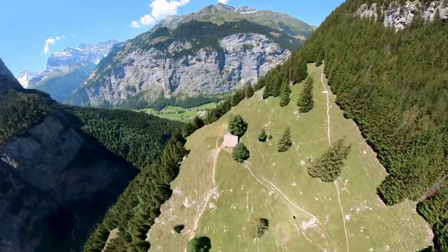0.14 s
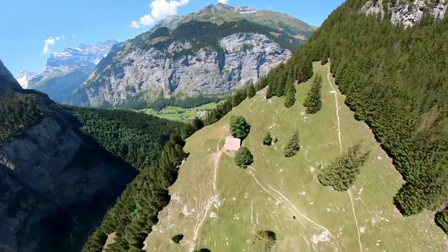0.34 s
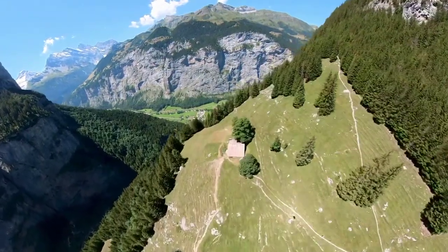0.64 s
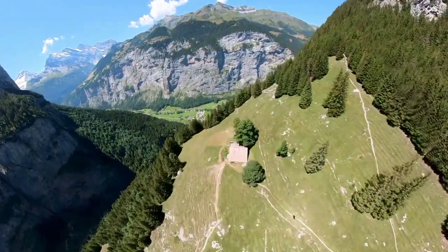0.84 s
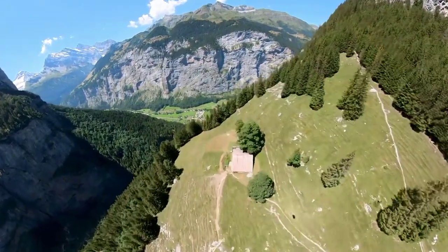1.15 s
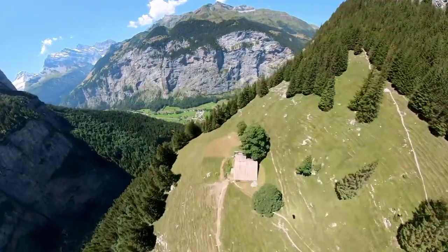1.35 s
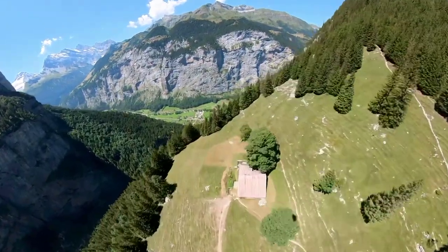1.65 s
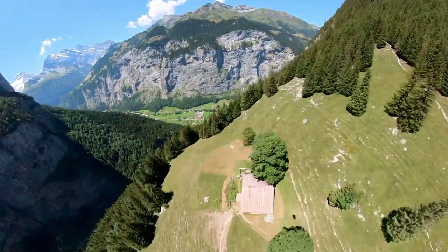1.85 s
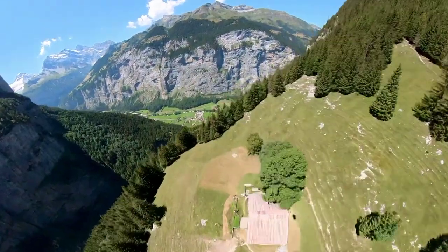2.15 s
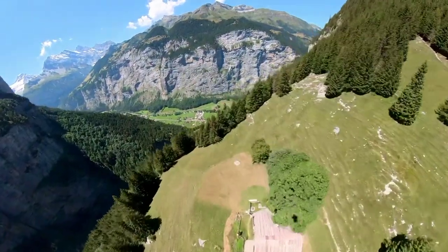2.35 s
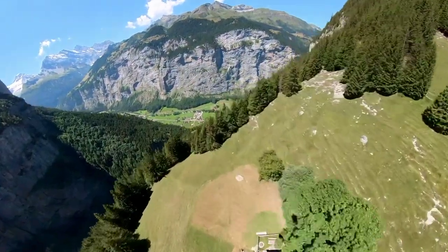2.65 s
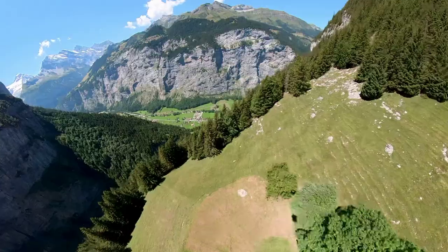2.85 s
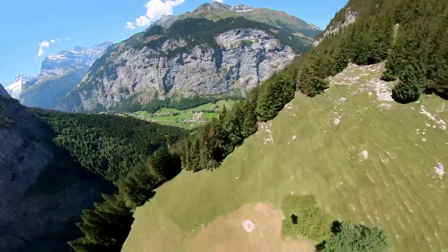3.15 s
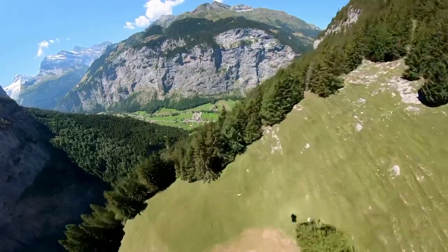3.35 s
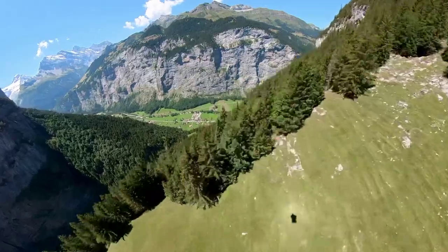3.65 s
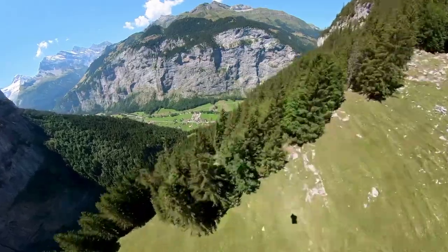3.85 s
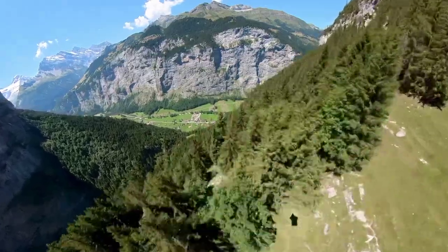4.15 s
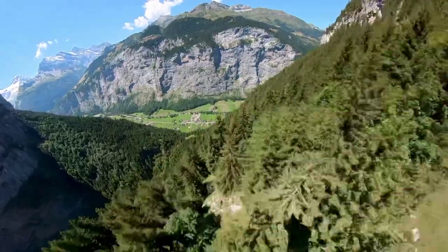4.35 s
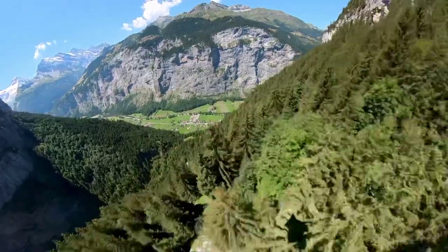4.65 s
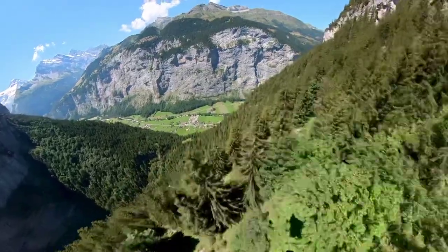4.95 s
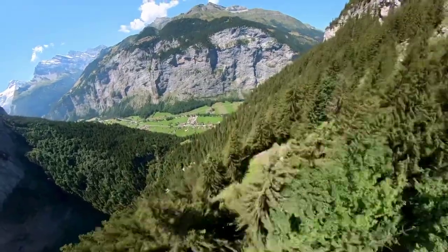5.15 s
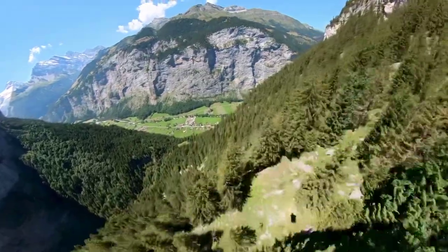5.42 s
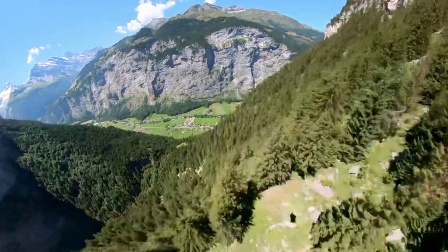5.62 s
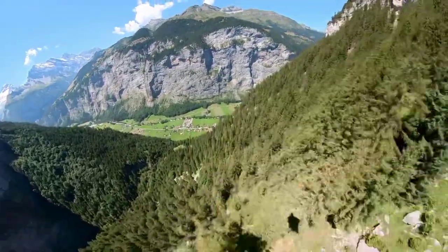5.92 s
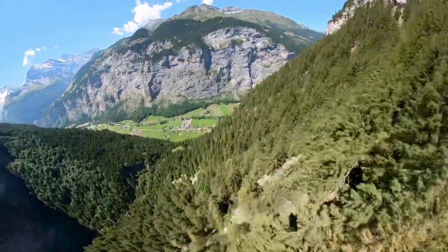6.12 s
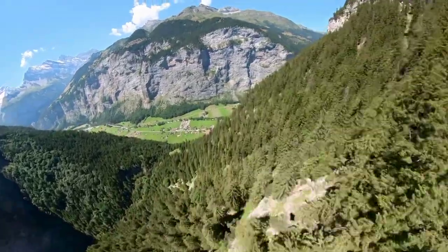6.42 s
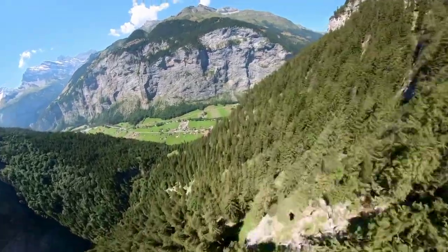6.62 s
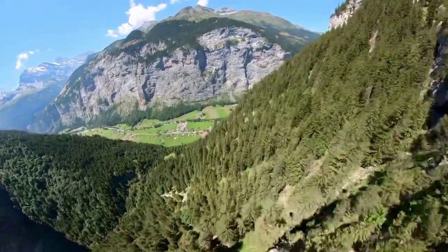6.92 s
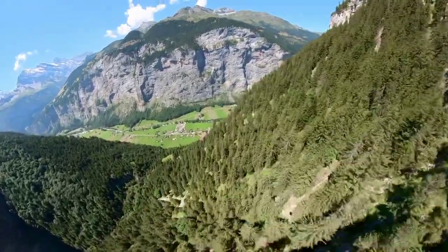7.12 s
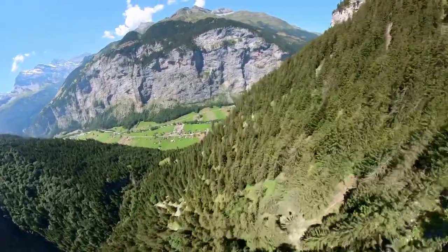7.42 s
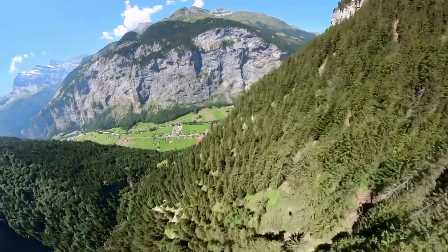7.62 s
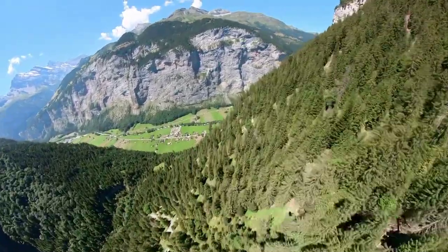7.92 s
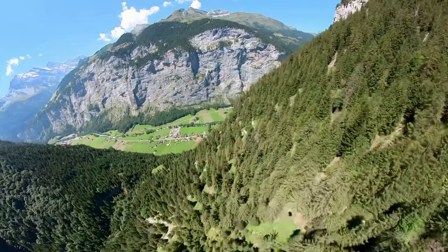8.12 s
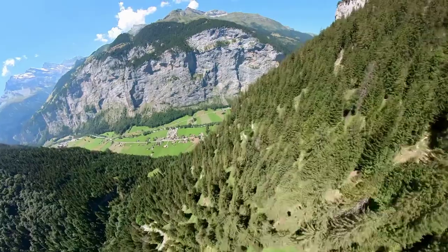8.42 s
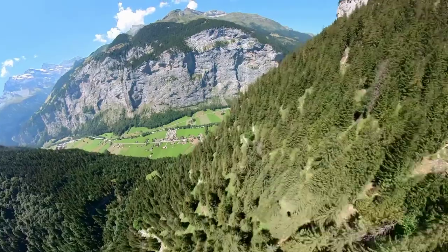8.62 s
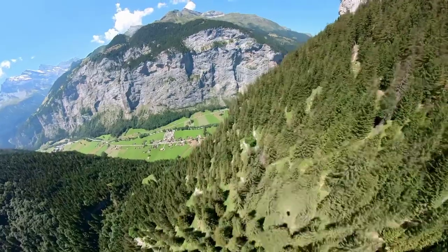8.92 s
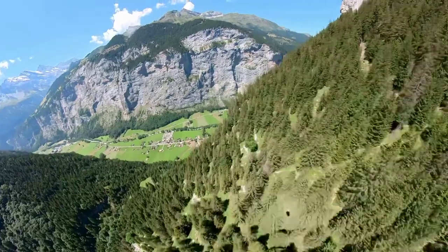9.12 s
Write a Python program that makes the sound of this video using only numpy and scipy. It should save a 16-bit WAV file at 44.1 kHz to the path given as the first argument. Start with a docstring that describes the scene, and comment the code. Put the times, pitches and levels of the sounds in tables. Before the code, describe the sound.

Air rushes steadily past a microphone flying over a mountainside, a thick low roar broken by irregular thumps.

```python
"""Wind on a flying camera

Wind roars over the microphone of a camera in fast flight above a mountainside.
Big swirls of air thump the microphone, smaller ones roar and rush, and its opening hisses near 7 kHz.
The wind gets brighter and duller as the flyer turns; brief swishes and little flaps pass through it."""
import sys
import numpy as np
from scipy import signal
from scipy.fft import rfft, irfft, next_fast_len
from scipy.io import wavfile
from scipy.ndimage import uniform_filter1d

SR = 44100
rng = np.random.default_rng(int(sys.argv[2]) if len(sys.argv) > 2 else 0)


def waveform_to_disk(signal):
    """Save audio, clipped to [-1, 1], as 16-bit WAV at the path in sys.argv[1]."""
    frames = np.transpose(np.atleast_2d(signal))
    scaled = np.clip(frames, -1, 1) * 32767
    samples = np.round(scaled).astype(np.int16)
    wavfile.write(sys.argv[1], SR, samples)


N = 408807
TIME = np.arange(N) / SR

# how much stronger the airflow is than in steady flight: time_s, change_db
AIRFLOW = [(0.0, 0.2), (0.12, -2.0), (0.28, -5.5), (0.36, -3), (0.6, -4.5), (0.76, 2), (0.88, 1.2),
           (1.0, 1.8), (1.28, -0.2), (1.32, 2.3), (1.4, -1.6), (1.72, 3), (1.8, 1.6), (2.2, 2.5),
           (2.28, -0.2), (2.36, 1.8), (2.4, 0.4), (2.84, 1), (2.88, -2.4), (3.0, 0.5), (3.08, -1.5),
           (3.32, 1), (3.52, 0.7), (3.6, -2), (3.72, 0), (3.8, -1.7), (3.84, 1.0), (4.28, 1), (4.4, -1.4),
           (4.48, 1.3), (4.92, 2.7), (5.24, -1.2), (5.4, 1.5), (5.48, -2), (5.8, -0.0), (5.88, -1.5),
           (6.04, -0.3), (6.12, -3.5), (6.2, -0.4), (6.68, -1.9), (7.0, 1.0), (7.08, -0.5), (7.2, 2.2),
           (7.28, -1), (7.48, 0.6), (7.72, -0.3), (8.04, 1.8), (8.12, -2.9), (8.32, 2), (8.48, -4),
           (8.84, -2), (9.21, -4.5)]
# how loud the low rumble is: time_s, level_db
RUMBLE_LEVELS = [(0.0, -29.5), (0.56, -26.5), (0.61, -33), (0.7, -28), (1.8, -32), (2.1, -27),
                 (2.22, -35.5), (2.35, -27), (2.7, -32), (3.05, -28.5), (4.1, -27.5), (4.23, -37),
                 (4.33, -27.5), (4.75, -30.5), (5.4, -28.5), (6.3, -27), (6.4, -34.5), (6.55, -28),
                 (7.1, -28.5), (8.9, -27), (9.2, -26.5)]
# big swirls of air hitting the microphone: peak_s, level_db
THUMPS = [(0.135, -20), (0.197, -24), (0.445, -22.5), (0.555, -21), (1.136, -24.5), (3.041, -22),
          (3.584, -24), (5.267, -22), (5.435, -18.5), (5.542, -22), (5.817, -20), (6.314, -17.5),
          (6.65, -30), (7.659, -23), (8.092, -22.5), (8.395, -27.5), (8.454, -22.5), (8.54, -21.5),
          (8.755, -26), (8.833, -22), (8.913, -24)]
# short surges of the roar: peak_s, level_db
ROAR_SURGES = [(0.141, -22.5), (1.036, -25), (1.266, -26.5), (1.812, -25), (2.258, -22.5), (2.461, -24),
               (3.05, -24.5), (4.231, -29), (4.674, -24), (4.939, -22.5), (6.464, -21.5), (7.008, -27),
               (7.248, -19.5), (7.995, -24.5), (8.248, -23), (8.39, -28.5), (8.92, -23), (9.09, -22)]
# spurts of hiss at the microphone's opening: peak_s, level_db, rise_s, fall_s
HISS_SPURTS = [(3.52, -64, 0.025, .022), (4.55, -66.5, 0.13, .14)]
# brief swishes, perhaps air catching cloth: peak_s, level_db, rise_s, fall_s
SWISHES = [(0.09, -67, .04, .025), (0.204, -47.5, 0.0068, 0.0088), (0.6, -55.5, 0.085, 0.06),
           (0.79, -57, 0.09, .022), (1.1, -62, .12, 0.14), (2.10, -56.5, 0.19, 0.25), (3.32, -57, .02, .03),
           (6.46, -55, 0.023, 0.22), (6.686, -52, .004, .022), (6.77, -55, 0.025, .1),
           (6.958, -49.5, 0.026, 0.031), (7.565, -51, 0.03, 0.025), (7.98, -57.5, .12, 0.14),
           (9.17, -54.5, 0.04, 0.11)]
# little flaps among the swishes: peak_s, level_db
FLAPS = [(0.202, -46.5), (0.209, -52), (0.632, -47), (0.815, -42), (6.525, -50), (6.739, -43), (6.96, -49),
         (7.572, -50), (7.648, -46)]

# the tone of each sound, or how strong its low and high parts are: frequency_hz, relative_level_db
RUMBLE_TONE = [(5, -31), (14, -22.5), (20, -15.5), (30, -7.5), (50, 2.5), (95, 2.5), (135, -2), (200, -23),
               (500, -55), (1500, -100)]
THUMP_TONE = [(15, -28.5), (30, -12), (55, -1.5), (95, 2), (135, 1.5), (200, -16), (500, -48), (1500, -100)]
ROAR_TONE = [(30, -39), (85, -13.5), (130, -1), (200, 0.5), (300, -2), (400, -5), (520, -13.5),
             (750, -29.5), (1500, -51), (4000, -100)]
RUSH_TONE = [(100, -27.5), (300, -2), (480, 3.5), (700, -1), (1000, -7.5), (1500, -16), (2000, -22),
             (2600, -28), (3200, -35), (3900, -43.5), (4350, -53), (5000, -55), (6500, -64.5),
             (10000, -100)]
HISS_TONE = [(3500, -43), (4900, -25.5), (5350, -16.5), (5800, -8), (6400, -1.5), (7000, 0.5), (7600, -2.5),
             (8200, -8.5), (8700, -17), (9200, -29), (9700, -55)]
SWISH_TONE = [(500, -28), (1300, 4.5), (2200, 5.5), (3000, -3), (3700, -12), (4400, -26.5), (5500, -36),
              (9000, -47)]
FLAP_TONE = [(600, -27), (1400, 1), (2200, 4.5), (2900, -5), (3600, -15), (4400, -37), (9000, -56)]

# each sound's level in steady flight, and the dB it gains when the airflow gains 1 dB
ROAR_DB, ROAR_SLOPE = -24, 0.42
RUSH_DB, RUSH_SLOPE = -33.5, 0.95
HISS_DB, HISS_SLOPE = -64.6, 0.97


def gain_of(db):
    """Turns decibels into a number to multiply a sound by."""
    return 10 ** (np.asarray(db) / 20)


def unit_strength(sound):
    """Scales a sound so that its average power is 1."""
    return sound / np.sqrt(np.mean(sound ** 2) + 1e-20)


def follow(points):
    """Joins (time, value) points with straight lines, giving a value for every sample."""
    return np.interp(TIME, *np.transpose(points))


def with_tone(sound, tone):
    """Turns a sound's frequencies up or down as a tone table says; the result has power 1."""
    size = next_fast_len(N)
    hz = np.fft.rfftfreq(size, 1 / SR)
    tone_hz, tone_db = np.transpose(tone)
    shape_db = np.interp(np.log(hz + 1), np.log(tone_hz + 1), tone_db)
    return unit_strength(irfft(rfft(sound, size) * gain_of(shape_db), size)[:N])


def wobble(rate_hz):
    """A random wavering with power 1, mostly slower than rate_hz."""
    size = next_fast_len(N)
    hz = np.fft.rfftfreq(size, 1 / SR)
    spectrum = rfft(rng.standard_normal(size)) / (1 + (hz / rate_hz) ** 2)
    return unit_strength(irfft(spectrum, size)[:N])


def swirls(tone, wobble_db, wobble_hz, steady_s):
    """Swirling air: noise that comes in quick bursts but stays even over spans longer than steady_s."""
    bursts = rng.standard_normal(N) * gain_of(wobble_db * wobble(wobble_hz))
    air = with_tone(bursts, tone)
    span = max(int(steady_s * SR), 1)
    local_power = uniform_filter1d(uniform_filter1d(air ** 2, span), span)
    return air / np.sqrt(abs(local_power) + 1e-12)


def bell(peak_s, width_s):
    """A smooth hump that rises to 1 at peak_s and falls away again."""
    return np.exp(-0.5 * ((TIME - peak_s) / width_s) ** 2)


def bumps(events, width_s):
    """A loudness curve with one even-sided hump for each row."""
    return sum(gain_of(level_db) * bell(peak_s, width_s) for peak_s, level_db in events)


def swells(events):
    """A loudness curve with one hump for each row, each with its own rise and fall."""
    return sum(gain_of(level_db) * bell(peak_s, np.where(TIME < peak_s, rise_s, fall_s))
               for peak_s, level_db, rise_s, fall_s in events)


def rumble_and_thumps():
    """The biggest swirls shove the thin skin inside the microphone: an uneven rumble with thumps."""
    rumble = swirls(RUMBLE_TONE, wobble_db=2.0, wobble_hz=11, steady_s=0.2)
    thump = swirls(THUMP_TONE, wobble_db=-4.0, wobble_hz=20, steady_s=0.043)
    return gain_of(follow(RUMBLE_LEVELS)) * rumble + bumps(THUMPS, width_s=0.018) * thump


def roar(flow_db):
    """Churned air behind the camera makes a thick, low roar that surges now and then."""
    wake = swirls(ROAR_TONE, wobble_db=1.13, wobble_hz=30, steady_s=0.14)
    surge = swirls(ROAR_TONE, wobble_db=4.5, wobble_hz=30, steady_s=0.013)
    level_db = ROAR_DB + ROAR_SLOPE * flow_db
    return gain_of(level_db) * wake + bumps(ROAR_SURGES, width_s=0.018) * surge


def rush(flow_db, gusts):
    """Small swirls rush past the microphone's opening, growing with the airflow and with each gust."""
    air = swirls(RUSH_TONE, wobble_db=0.72, wobble_hz=140, steady_s=0.083)
    level_db = RUSH_DB + RUSH_SLOPE * flow_db + 0.38 * gusts
    return gain_of(level_db) * air


def hiss(flow_db, gusts):
    """The tiniest swirls make the air in the opening ring with a broad hiss, sometimes in a spurt."""
    air = swirls(HISS_TONE, wobble_db=0.6, wobble_hz=120, steady_s=0.15)
    level_db = HISS_DB + HISS_SLOPE * flow_db + 0.4 * gusts
    return np.hypot(gain_of(level_db), swells(HISS_SPURTS)) * air  # hypot adds the two powers


def swishes():
    """Soft swells of crackly, fairly high noise, perhaps air catching cloth."""
    return swells(SWISHES) * swirls(SWISH_TONE, wobble_db=4.5, wobble_hz=260, steady_s=0.02)


def flaps():
    """Short, dull snaps, strongest near 2 kHz."""
    snap = swirls(FLAP_TONE, wobble_db=4.0, wobble_hz=150, steady_s=0.006)
    return bumps(FLAPS, width_s=0.0022) * snap


def scene():
    """Adds up all the sounds. One airflow drives roar, rush and hiss; rush and hiss share quick gusts."""
    flow_db = follow(AIRFLOW)
    gusts = wobble(rate_hz=14)
    wind = rumble_and_thumps() + roar(flow_db) + rush(flow_db, gusts) + hiss(flow_db, gusts)
    return (wind + swishes() + flaps())[None]  # one channel


def record(dry):
    """The camera cuts off the highest sounds."""
    cutoff_hz = 9500
    low_pass = signal.firwin(511, cutoff_hz, window=("kaiser", 9), fs=SR)
    return signal.oaconvolve(dry, low_pass[None], "same")


dry = scene()
out = record(dry)
waveform_to_disk(out)
```